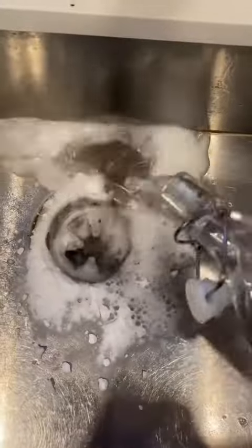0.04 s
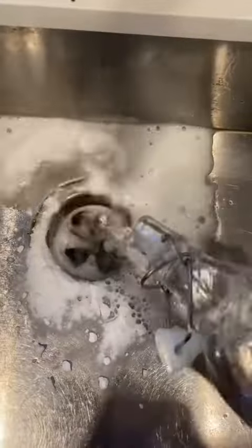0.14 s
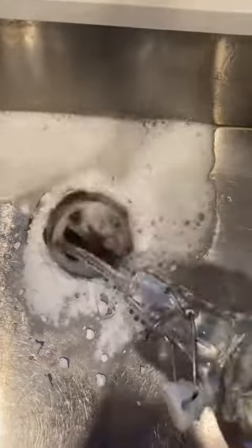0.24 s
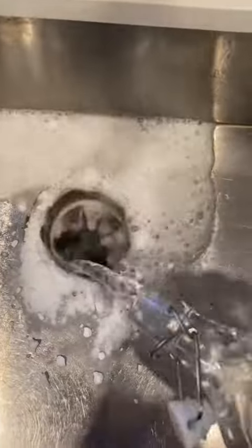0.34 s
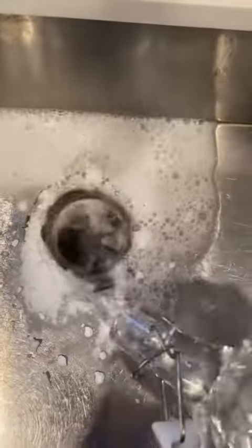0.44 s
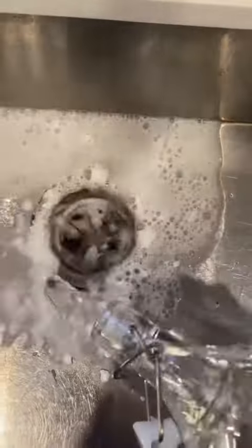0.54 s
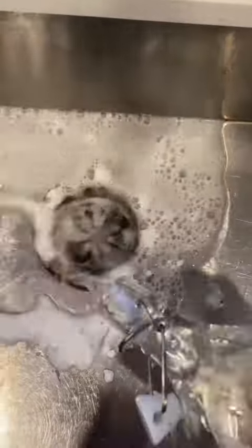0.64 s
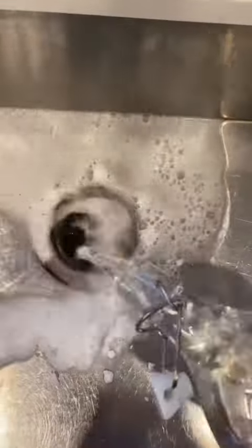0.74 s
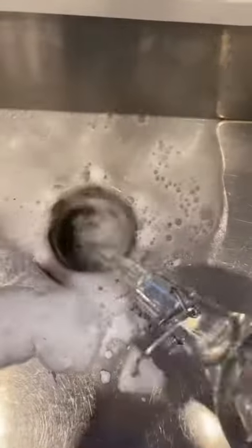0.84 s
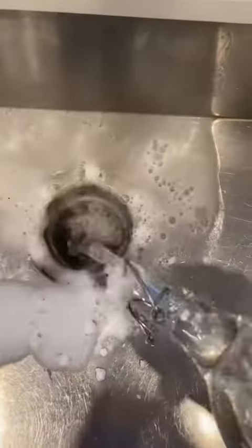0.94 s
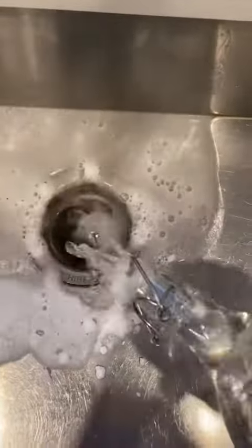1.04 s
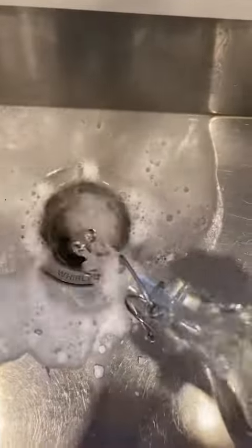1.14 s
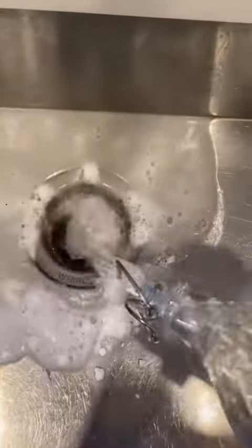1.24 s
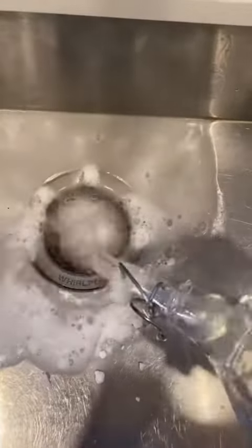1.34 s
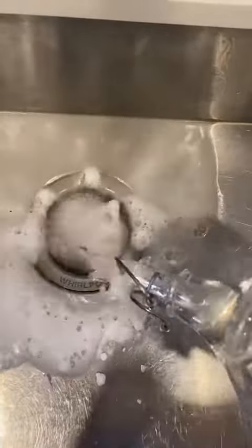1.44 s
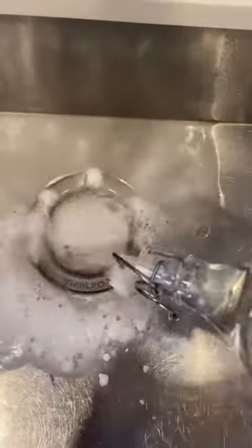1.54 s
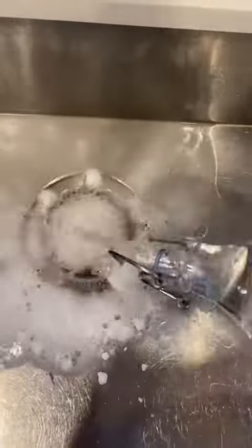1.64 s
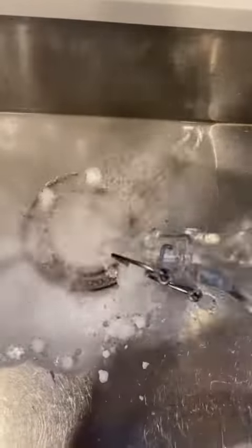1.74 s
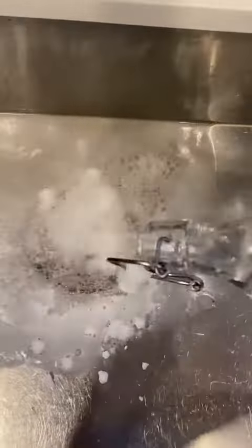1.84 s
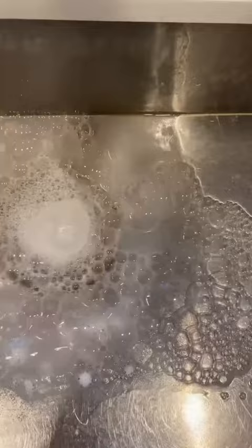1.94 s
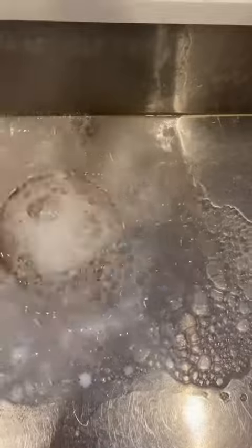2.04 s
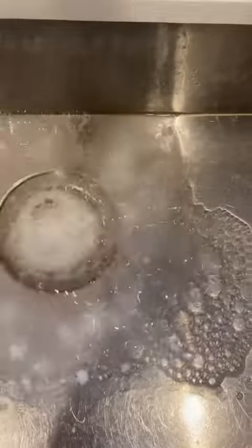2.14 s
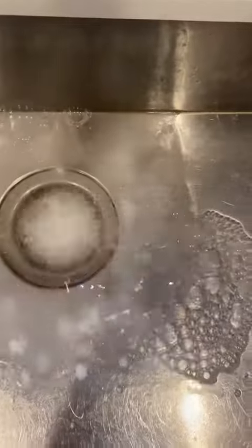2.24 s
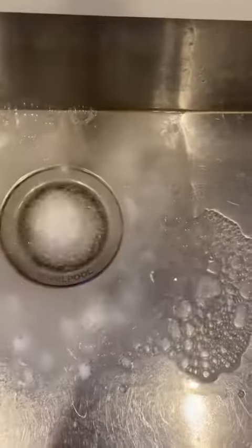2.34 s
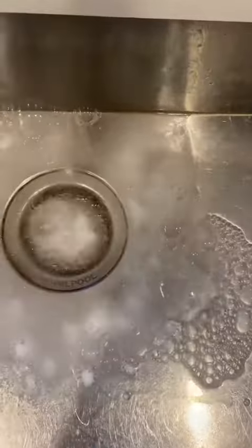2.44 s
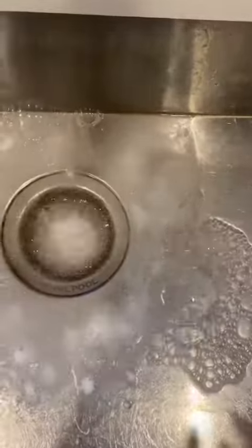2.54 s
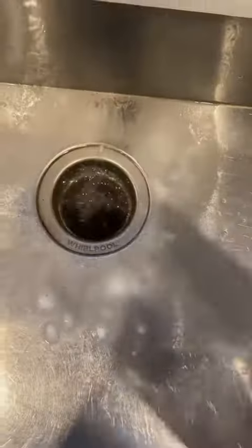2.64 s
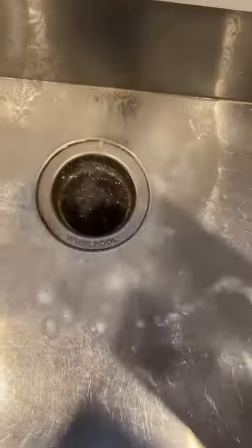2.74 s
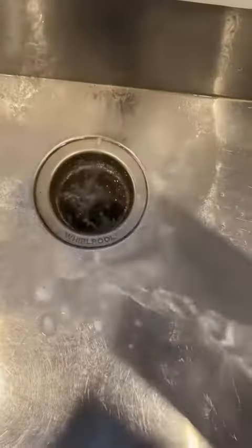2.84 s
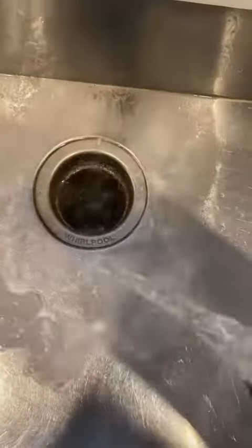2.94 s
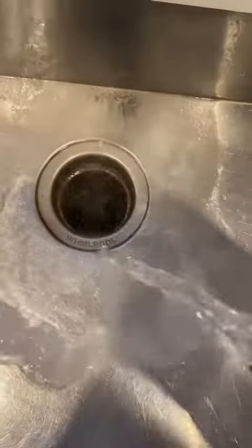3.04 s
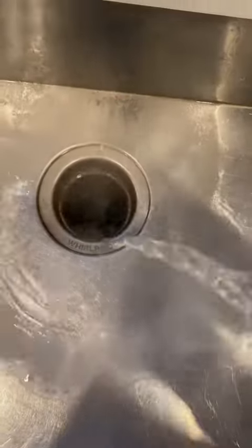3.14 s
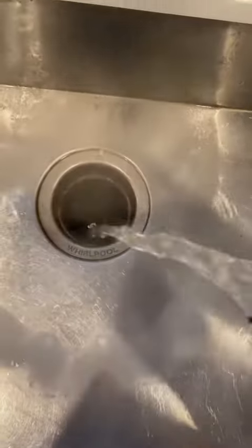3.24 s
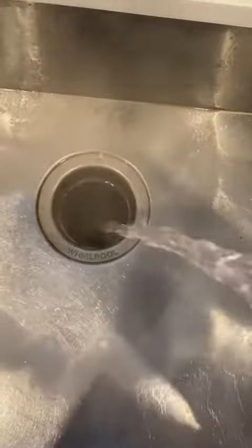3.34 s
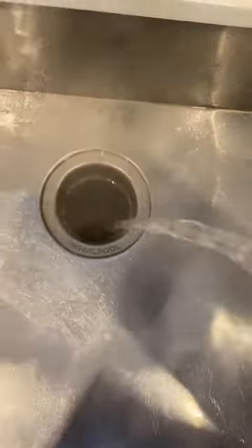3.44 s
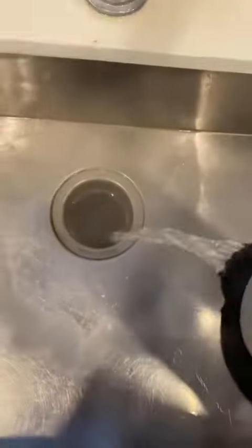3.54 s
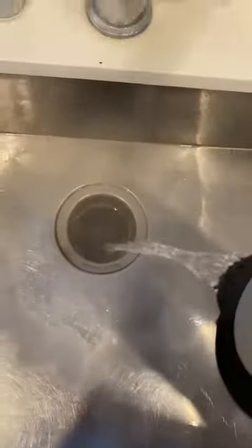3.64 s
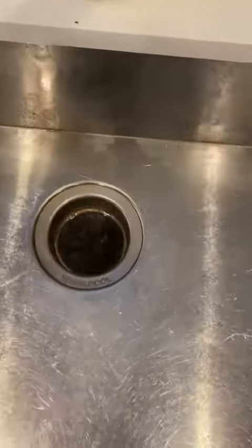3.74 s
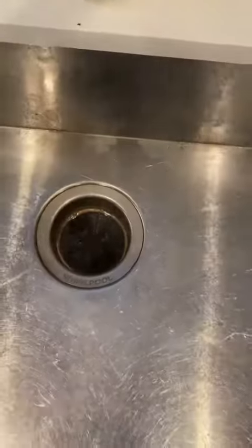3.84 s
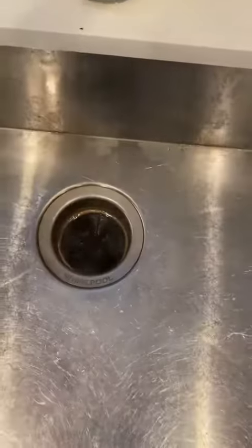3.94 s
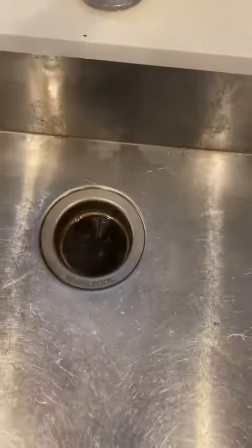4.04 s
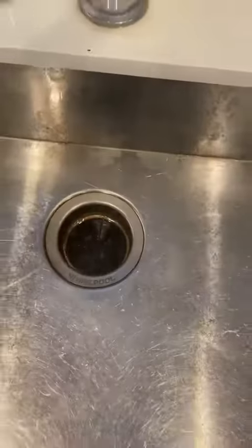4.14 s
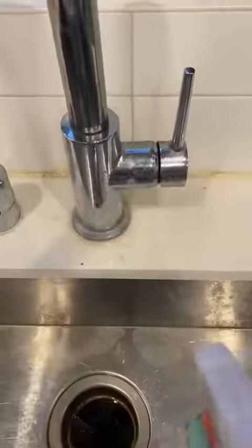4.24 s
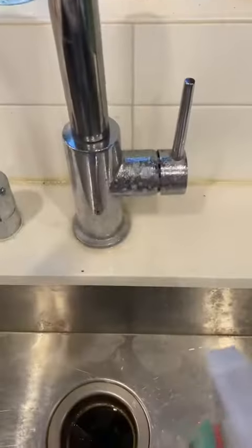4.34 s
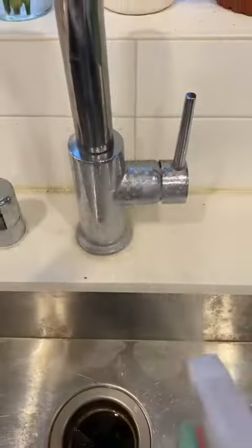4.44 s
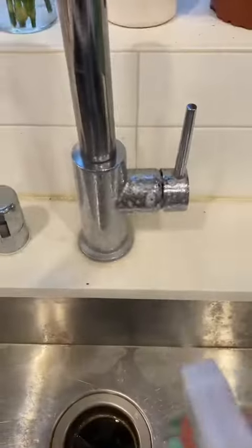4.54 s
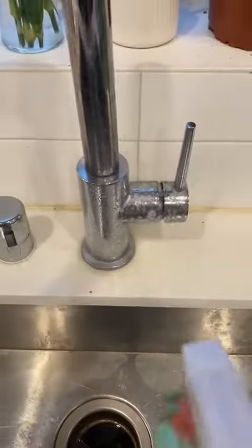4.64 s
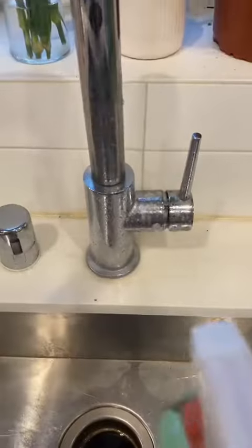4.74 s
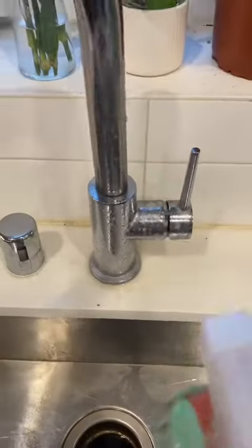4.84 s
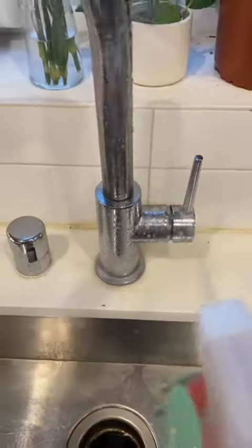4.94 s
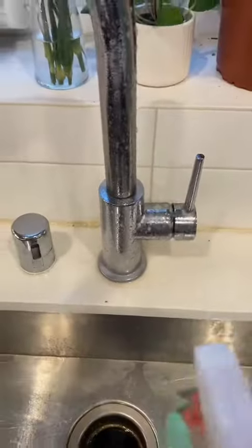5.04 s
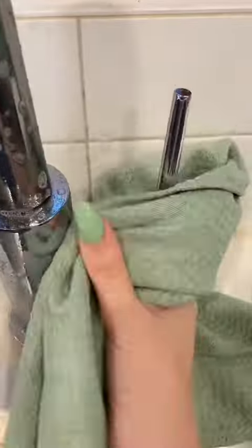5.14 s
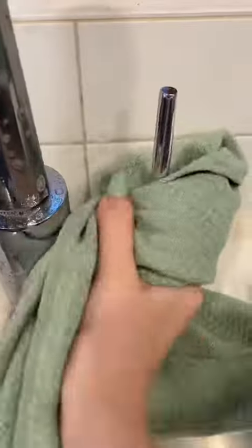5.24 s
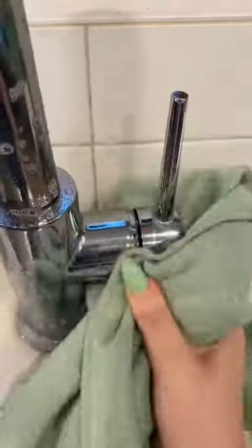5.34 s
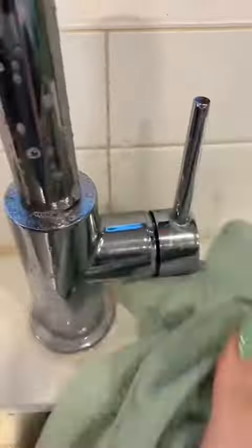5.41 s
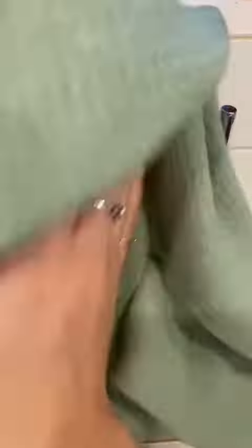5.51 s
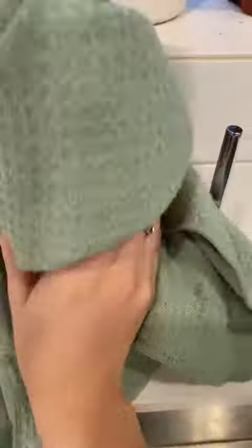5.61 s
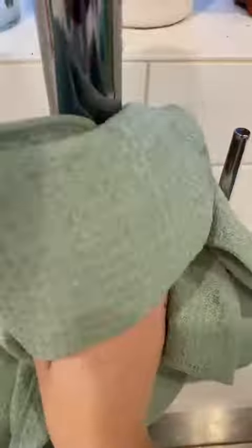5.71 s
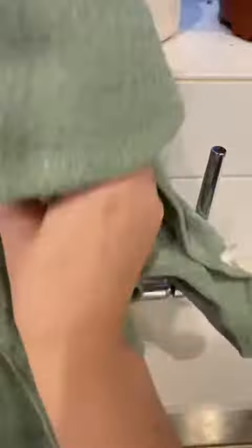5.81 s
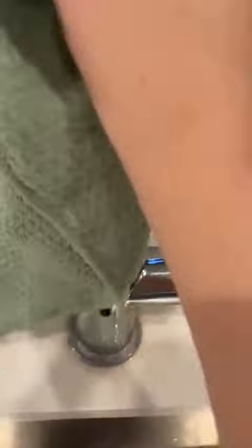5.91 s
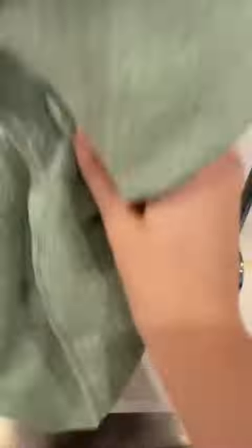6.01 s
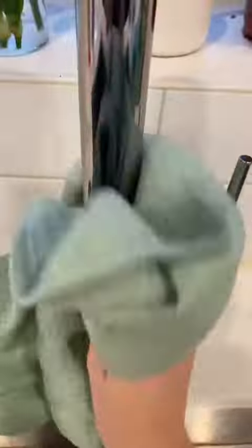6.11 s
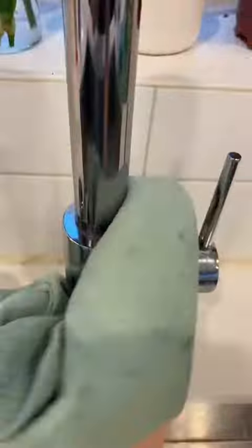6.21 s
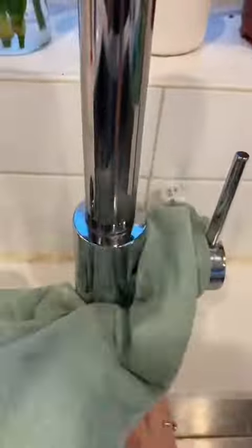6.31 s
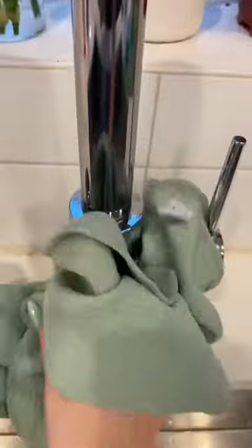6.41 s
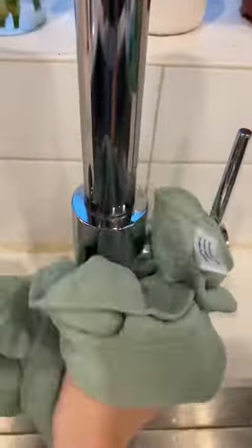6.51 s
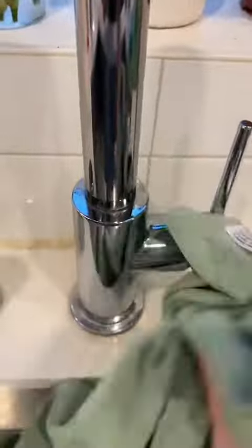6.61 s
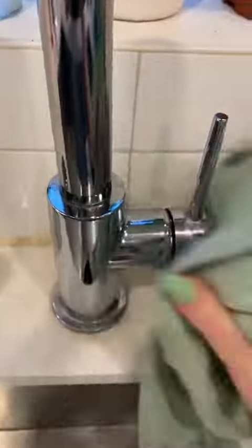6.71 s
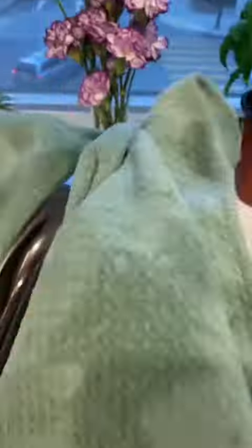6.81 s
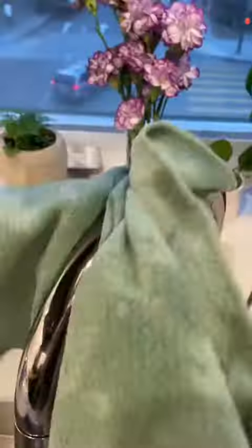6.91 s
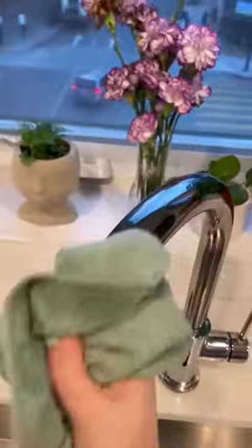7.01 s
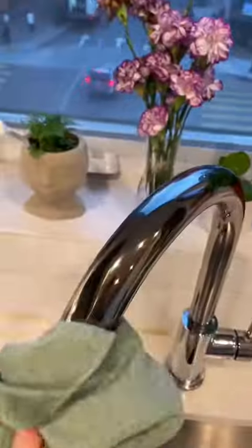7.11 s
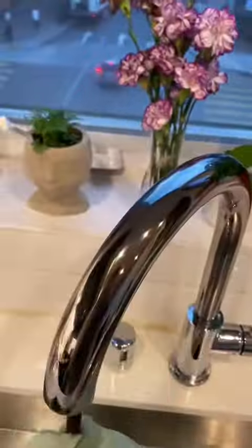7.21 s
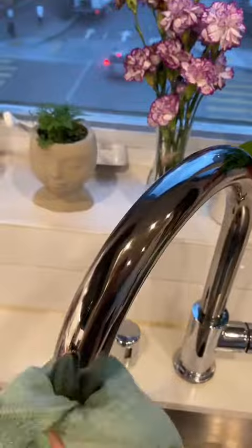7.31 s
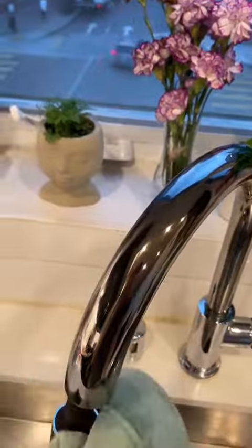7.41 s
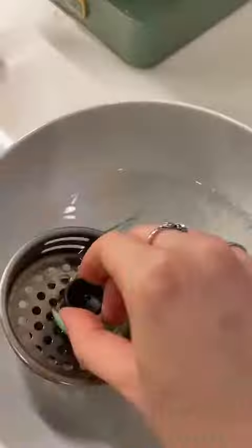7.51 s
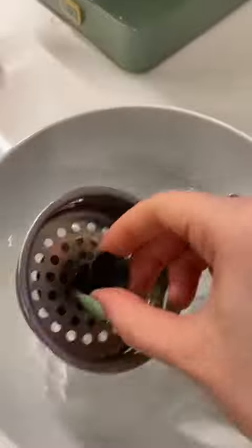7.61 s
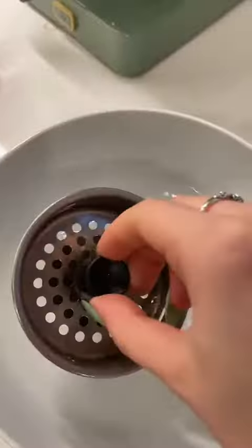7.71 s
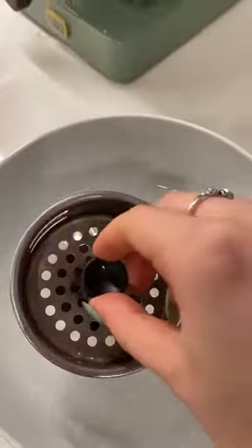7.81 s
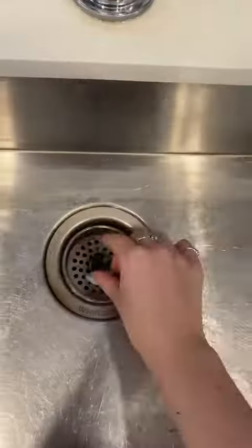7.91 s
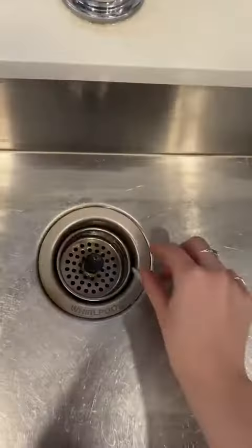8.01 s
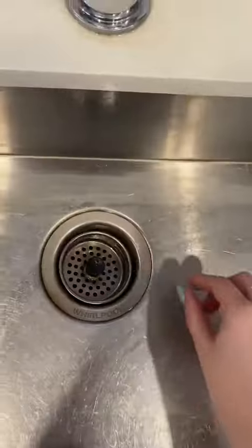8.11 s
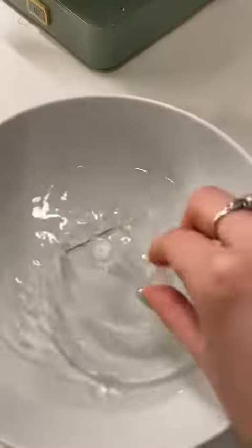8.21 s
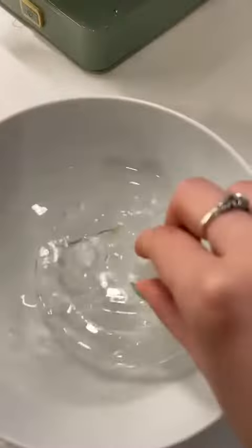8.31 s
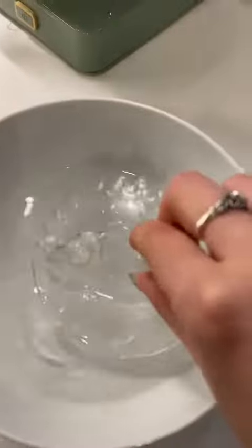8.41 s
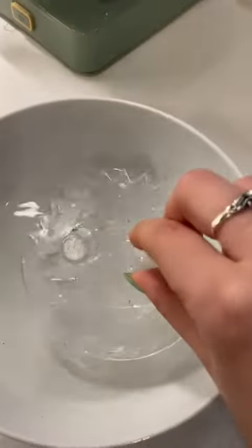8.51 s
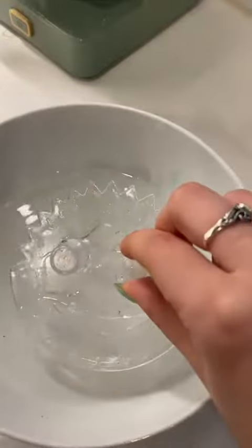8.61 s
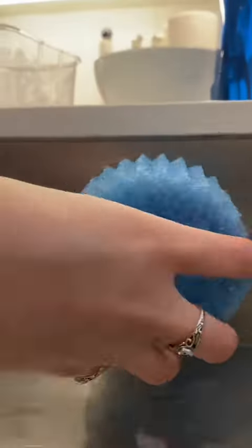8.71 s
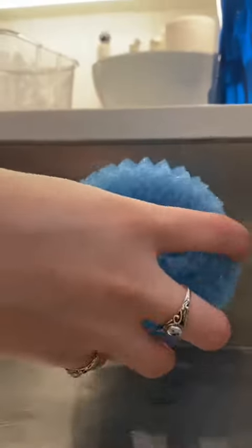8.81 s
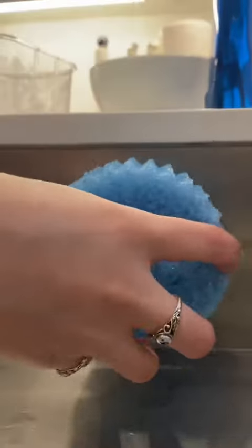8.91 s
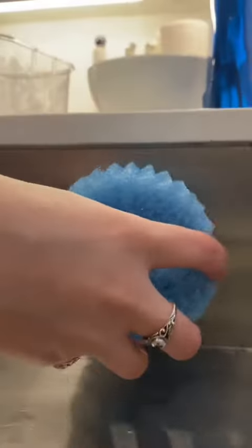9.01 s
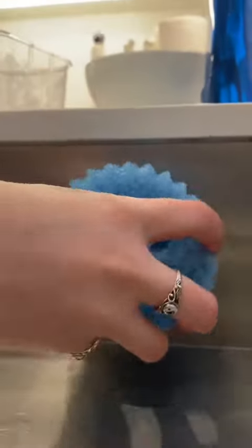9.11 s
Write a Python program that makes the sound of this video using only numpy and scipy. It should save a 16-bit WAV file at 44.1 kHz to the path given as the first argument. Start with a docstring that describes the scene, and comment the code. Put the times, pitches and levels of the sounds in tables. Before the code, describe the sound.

Close stereo sound at a steel kitchen sink, with short metallic reflections and a faint room murmur. From 0 to 2.7 s liquid pours from a bottle in uneven glugs onto fizzing, crackling foam, booming the basin; a glass stopper clinks near 0.9 s, and heavier gulps plop at 2.0 and 2.2 s. A water jet spatters and drums on the floor from 2.7 s, gurgles into the drain from about 3.1 s, and stops at 3.7 s, leaving weak drips until 4.2 s. Nine rapid trigger squirts hiss and thump, 4.2-5.0 s, with plastic snaps. A cloth rubs softly over the tap, 5.15-7.5 s, with padded bumps and a hollow spout; a distant motor drones faintly around 7 and 8 s. Small metal clicks begin at 7.5 s. At 7.9 s a strainer clatters sharply into the drain and rings briefly. Wet scrubber slaps with low thuds come at 8.76-9.1 s.

```python
"""Liquid glugs from a bottle onto fizzing soda in a steel kitchen sink, then a jet drums and drains,
a trigger bottle sprays, a cloth wipes the tap, a strainer drops into the drain and a scrubber dabs.
Foam, jet, mist and cloth are noise shaped by spectra; basin, spout and bottle are sets of resonances;
glass and strainer are decaying sine modes; bubbles are short rising tones. A motor drones far away."""
import sys
import numpy as np
from scipy import signal
from scipy.fft import rfft, irfft, next_fast_len
from scipy.io import wavfile
from scipy.ndimage import map_coordinates

SR = 44100
rng = np.random.default_rng(int(sys.argv[2]) if len(sys.argv) > 2 else 0)


def dump(signal):
    """Clip the signal to [-1, 1] and save it as 16-bit WAV at the path in sys.argv[1]."""
    limited = np.clip(np.atleast_2d(signal).T, -1, 1)
    pcm = np.round(limited * 32767).astype(np.int16)
    wavfile.write(sys.argv[1], SR, pcm)


N = 403956


def amp(db):
    """Level law: decibels to amplitude gain."""
    return 10 ** (np.asarray(db) / 20)


def unit(x):
    """Normalisation: a signal scaled to rms 1."""
    return x / np.sqrt(np.mean(x ** 2) + 1e-20)


def clock():
    """Sampling: the time of every sample in seconds."""
    return np.arange(N) / SR


def along(points, hz):
    """Logarithmic frequency scale: (hz, value) points joined by straight lines."""
    f, v = np.transpose(points)
    return np.interp(np.log(hz + 1), np.log(f + 1), v)


def levels(rows, edge=0.0046):
    """Level interpolation in dB: a gain curve for each column, silent outside the rows' span."""
    s, *columns = np.transpose(rows)
    gate = np.clip(1 + np.minimum(clock() - s[0], s[-1] - clock()) / edge, 0, 1)
    return [gate * amp(np.interp(clock(), s, column)) for column in columns]


def wobble(rate):
    """Slow random modulation: a smooth curve with rate knots a second."""
    knots = rng.standard_normal(2048)
    coarse_s = clock()[::64]
    curve = map_coordinates(knots, [coarse_s * rate], mode="wrap")
    return np.interp(clock(), coarse_s, curve)


def filtered(x, response):
    """Linear filtering: the spectrum of x times a response of frequency."""
    m = next_fast_len(N + SR // 4, True)
    return irfft(rfft(x, m) * response(np.fft.rfftfreq(m, 1 / SR)), m)[..., :N]


def colour(points):
    """Spectral shaping: the response of a (hz, level_db) spectrum."""
    return lambda hz: amp(along(points, hz))


def body(modes):
    """Modal superposition: (hz, width_hz, level_db) resonances, summed with alternating signs."""
    def response(f):
        total = 0
        for k, (centre, width, db) in enumerate(modes):
            damping = 1j * f * width
            total = total + (-1) ** k * amp(db) * damping / (centre * centre - f * f + damping)
        return total
    return response


def rush(response, rate=0, spread_db=3):
    """Shot noise: stereo of rms 1, smooth or mixed with tiny impacts at rate a second."""
    # likeness of left and right: hz, correlation
    alike = [(100, 1), (250, 1), (450, 0.89), (750, 0.68), (1000, 0.72), (1700, 1), (2800, 0.43),
             (5000, 0.58), (12000, 0.43)]
    x = rng.standard_normal((2, N))
    if rate:
        hits = rng.random(N) < rate / SR
        sizes = amp(spread_db * np.minimum(rng.exponential(size=N), 4))
        x = unit(x * hits * sizes) + .5 * x

    def mid_and_side(hz):
        turn = np.arccos(np.clip(along(alike, hz), -1, 1)) / 2
        return response(hz) * np.array([np.cos(turn), np.sin(turn)])

    mid, side = filtered(x, mid_and_side)
    return unit(np.array([mid + side, mid - side]))


def blows(rows, rise):
    """Exponential decay: (peak_s, level_db, t60_s) blows that swell with time constant rise."""
    env = np.zeros(N)
    for s, db, t60 in rows:
        near = np.arange(max(int((s - .1) * SR), 0), min(int((s + .5) * SR), N))
        t = near / SR - s
        env[near] += amp(db - 60 * np.maximum(t, 0) / t60) * np.exp(np.minimum(t, 0) / rise)
    return env


def strokes(rows, edge):
    """Sustained excitation: the envelope of (start_s, length_s, level_db) strokes with soft edges."""
    t = clock()
    env = np.zeros(N)
    for s, length, db in rows:
        onset = np.interp(t, [s - edge, s + edge], [0, 1])
        release = np.interp(t, [s + length - edge / 2, s + length + 2 * edge], [1, 0])
        env += amp(db) * np.minimum(onset, release)
    return env


def swell(middle, length):
    """Smooth excitation: a rounded rise and fall about its middle."""
    return np.maximum(1 - ((clock() - middle) / (length * .7)) ** 2, 0) ** 2


def ring(hits, modes, scatter_db, width=.2):
    """Free vibration: hits add energy to (hz, level_db, t60_s) modes and jolt their phase."""
    out, t = np.zeros((2, N)), np.arange(SR // 2) / SR
    s, db = np.transpose(hits)
    age = t - (s - s[0])[:, None]
    latest = np.sum(age >= 0, axis=0) - 1
    for hz, level, t60 in modes:
        size = db + level + scatter_db * rng.standard_normal(len(s))
        decays = amp(size[:, None] - 60 * np.abs(age) / t60) * (age >= 0)
        env = np.linalg.norm(decays, axis=0)
        jolt = 2 * np.pi * rng.random(len(s))[latest]
        # the ears differ by width radians from 3 kHz up, by less below
        ears = width * rng.choice([-.5, .5]) * np.array([[1], [-1]]) * min(hz / 3000, 1)
        out[:, round(s[0] * SR):][:, :len(t)] += env * np.sin(2 * np.pi * hz * t + jolt + ears)
    return out


def knocks(hits, modes, rise):
    """Damped oscillation: soft (s, level_db) blows set (hz, level_db, t60_s) modes swinging."""
    out, t = np.zeros(N + SR), np.arange(SR // 4) / SR
    for s, db in hits:
        swing = np.zeros(len(t))
        for hz, level, t60 in modes:
            pitch = hz * (1 + .03 * rng.standard_normal())
            swing += amp(db + level - 60 * t / t60) * np.sin(2 * np.pi * pitch * t)
        out[round(s * SR):][:len(t)] += swing * (1 - np.exp(-t / rise))
    return out[:N]


def struck(envelope, response, width):
    """Forced vibration: contact noise drives a body; width is the share unlike between the ears."""
    noise = rng.standard_normal(N) + width * rng.standard_normal((2, N))

    def even(hz):
        return response(hz) / np.sqrt(np.mean(np.abs(response(hz)) ** 2))

    return filtered(envelope * unit(noise), even)


def sings(rows, q):
    """Resonant filtering: (middle_s, length_s, level_db, pitch_hz) swells of narrow noise."""
    out = np.zeros((2, N))
    for s, length, db, hz in rows:
        env = swell(s, length)
        near = np.flatnonzero(env)
        noise = rng.standard_normal(SR) + .5 * rng.standard_normal((2, SR))
        peak = signal.iirpeak(hz, q, SR)
        tone = unit(signal.lfilter(*peak, signal.lfilter(*peak, noise)))
        out[:, near] += amp(db) * env[near] * tone[:, :len(near)]
    return out


def clicks(rows, q, rise_share):
    """Impact on a resonator: (s, level_db, pitch_hz, t60_s) bursts, the longer ones softer in onset."""
    out, t = np.zeros((2, N + SR)), np.arange(-SR // 16, SR // 8) / SR
    for s, db, hz, t60 in rows:
        noise = rng.standard_normal(len(t)) + .5 * rng.standard_normal((2, len(t)))
        tone = signal.lfilter(*signal.iirpeak(hz, q, SR), noise)
        env = amp(db - 60 * np.maximum(t, 0) / t60) * np.exp(np.minimum(t, 0) / (rise_share * t60))
        out[:, round((s + t[0]) * SR):][:, :len(t)] += unit(tone) * env
    return out[:, :N]


def bubbles(rate, pitch_hz, cycles, octaves=1, from_s=0, count=400):
    """Bubble resonance: air pockets and droplets ring within octaves of a pitch, rising as they fade."""
    chance = rng.random((count, 4))
    start = from_s + np.cumsum(-np.log(1 - chance[:, 0])) / rate  # Poisson arrivals
    hz = pitch_hz * 2 ** (octaves * (2 * chance[:, 1:2] - 1))
    t = np.arange(SR // 25) / SR
    age = t * hz / cycles
    env = chance[:, 2:3] ** 2 * np.exp(-age) * (1 - np.exp(-8 * age))
    blips = env * np.sin(2 * np.pi * hz * t * (1 + 0.045 * np.minimum(age, 4)))
    at = (start[:, None] * SR).astype(int) + np.arange(len(t))
    place = chance[:, 3:] / 2
    return np.array([np.bincount(at.ravel(), (blips * side).ravel(), N)[:N] for side in (.5 + place, 1 - place)])


def pan(x, left_db):
    """Interaural level difference: leans a sound to the left."""
    return x * amp([[left_db / 2], [-left_db / 2]])


def pour():
    """Bubble bursts and forced vibration: foam fizzes while the stream drums on the steel."""
    # fizz of the soda and force of the stream, relative levels: s, foam_hiss_db, splash_db
    strength = [(0, -41, -39.5), (.75, -37.5, -40.5), (1.0, -35, -36.5), (1.2, -37, -34), (1.6, -38.5, -38),
                (1.92, -35.5, -36), (2.3, -40.5, -37.5), (2.66, -43, -37)]
    # the bottle empties in surges that boom the basin: start_s, length_s, level_db
    surges = [(.29, 0.012, -28.5), (.54, 0.27, -36.5), (.85, 0.098, -33), (1.1, 0.043, -32.5),
              (1.26, 0.17, -33.5), (1.53, 0.11, -29.5), (1.8, 0.14, -31.5), (2.01, 0.078, -35),
              (2.51, 0.035, -37)]
    # the stream churns air into the pool, relative levels: start_s, length_s, bubble_db
    churn = [(.1, 0.96, -39.5), (1.16, 0.28, -35), (1.52, 0.32, -43)]
    # foam spectrum: hz, density_db_per_hz
    foam_spectrum = [(500, -30), (1200, -5), (2200, 0.5), (2700, 4.5), (3300, 0), (4400, 2.5), (6000, 4),
                     (8500, 2), (11500, -1.5), (15500, -3)]
    # basin resonances: hz, width_hz, level_db
    basin = [(142.6, 13.1, 3.5), (224.3, 32.3, -2), (402, 55, -9.5), (517, 29.5, -7.5), (735, 68, -12),
             (924, 96, -16.5), (1120, 247, -21.5)]
    boom_between_db = -44  # the basin between surges

    hiss, splash = levels(strength)
    boom = np.maximum(strokes(surges, edge=0.044), amp(boom_between_db) * (splash > 0))
    foam = hiss * amp(1.05 * wobble(25.01)) * rush(colour(foam_spectrum), rate=9700, spread_db=1.5)
    stream = splash * amp(2.0 + 0.48 * wobble(25.0)) * rush(body(basin), rate=1500, spread_db=0.5)
    patter_body = body([(1127, 720, -0.53), (2300, 940, -1.5)])
    patter = amp(-15.5 + 5.3 * wobble(45.3)) * rush(patter_body, rate=900, spread_db=4.0)
    small = bubbles(rate=220, pitch_hz=1750, cycles=7.7, count=520)
    large = amp(3.5) * bubbles(rate=58, pitch_hz=748, cycles=4.3)
    blips = strokes(churn, edge=0.056) * (small + large + patter)
    panel = boom * amp(0.94 * wobble(21)) * rush(body([(62.0, 16, 6.5), (116, 44, -12.5)]))
    return foam + stream + blips + panel + gulps()


def gulps():
    """Impact and cavity resonance: slugs of liquid splash and thud while trapped air squeaks."""
    # gulps landing on the basin: s, splash_db, splash_t60_s, thud_db
    landings = [(2.008, -16.5, 0.047, -32), (2.0117, -25, 0.036, -21.5), (2.035, -28, 0.27, -28),
                (2.215, -23.5, 0.19, -36), (2.222, -35, 0.065, -21)]
    # squeaks of trapped air: start_s, length_s, first_hz, last_hz, level_db
    chirps = [(1.999, 0.022, 2270, 1920, -43), (2.198, 0.03, 1950, 2440, -40.5)]
    # splash spectrum: hz, density_db_per_hz
    splash_spectrum = [(80, -15), (200, 8), (330, 4), (560, -1.5), (1100, -8), (1600, -31), (2200, -28),
                       (4000, -41)]
    # modes of the thud: hz, level_db, t60_s
    thud_modes = [(230, 6, 0.052), (389, -1, .04), (600, 6, 0.042)]

    splash = blows([row[:3] for row in landings], rise=0.0018) * rush(colour(splash_spectrum))
    thud = knocks([(s, db) for s, splash_db, t60, db in landings], thud_modes, rise=.001)
    squeak = np.zeros(N)
    for s, length, first_hz, last_hz, db in chirps:
        glide = np.interp(clock(), [s, s + length], [first_hz, last_hz])
        pitch = glide * (1 + 0.042 * wobble(400))
        squeak += amp(db) * swell(s + length / 2, length) * np.sin(2 * np.pi * np.cumsum(pitch) / SR)
    return splash + thud + squeak


def stopper():
    """Impact and free vibration: the wire stopper ticks on the glass bottle, which rings briefly."""
    # the wire hits the glass, relative levels: s, level_db
    clinks = [(0.8848, -23.5), (0.8875, -23), (0.894, -23.5), (0.947, -32)]
    # glass modes: hz, level_db, t60_s
    glass = [(2025, -13, .04), (2665, -12, .04), (3977, -11, .035), (4160, -1, .05), (4538, 0, .06),
             (6230, -15, .035), (7752, -10, .08), (10000, -18, .033)]
    wire = body([(725, 200, -3.5), (2420, 580, -1.5), (4590, 1700, -2), (9700, 8000, -28.5)])
    tick = blows([(s, db - 10.0, .04) for s, db in clinks], rise=0.011) * rush(wire)
    return tick + amp(-1) * ring(clinks, glass, scatter_db=-7.5)


def rinse():
    """Turbulent impact and plate modes: a jet spatters, booms the floor and gurgles down the drain."""
    # the jet spits: peak_s, level_db, t60_s
    spurts = [(2.731, -72, 0.03), (2.838, -39.5, 0.096)]
    # sizzles on the drain's flange as the aim shifts: middle_s, length_s, level_db, pitch_hz
    sizzles = [(3.17, 0.029, -50.5, 2670), (3.19, 0.1, -54, 5050), (3.255, 0.065, -52, 4870),
               (3.295, 0.025, -47, 4370), (3.35, 0.11, -55, 4370), (3.395, 0.074, -46.5, 4860),
               (3.5, 0.23, -51, 4800), (3.615, 0.084, -51.5, 2270), (3.63, 0.18, -51, 4500)]
    # the jet bears on the floor panel: start_s, length_s, level_db
    pushes = [(2.7, 0.21, -41.5), (2.86, 0.23, -39.5), (3.04, 0.32, -32), (3.53, 0.18, -30.5)]
    # the jet plunges into the drain: start_s, length_s, level_db
    plunges = [(3.185, 0.042, -29.5), (3.24, 0.03, -29), (3.3, 0.07, -38), (3.385, 0.09, -32),
               (3.51, 0.1, -39), (3.6, 0.079, -35.5)]
    # spatter spectrum: hz, density_db_per_hz
    spatter_spectrum = [(600, -30), (1500, 0.5), (2300, -1.5), (3100, -5), (4800, 0), (6500, 2),
                        (11000, -4), (15500, -6.5)]
    # resonances of the wet basin, then of the drain: hz, width_hz, level_db
    wet_basin = [(225, 32, 1), (406, 77, -2.5), (627, 47, -3.5), (751, 73, -2), (953, 91, -3.5),
                 (1320, 500, -13.5), (1660, 2700, -21.5)]
    drain = [(225.6, 36.4, 4), (276, 84, -2.5), (380, 91, -15), (1010, 410, -22)]
    on_s, at_drain_s, off_s = 2.668, 3.076, 3.725  # flat floor first, then the drain
    swing_s = 0.15  # the swing starts this long before at_drain_s and ends half as long after
    on_floor, at_drain = (-62.5, -42.5), (-48, -43.5)  # relative spatter and splash, dB

    spatter, splash = levels([(on_s, *on_floor), (at_drain_s - swing_s, *on_floor),
                              (at_drain_s + swing_s / 2, *at_drain), (off_s, *at_drain)])
    spray_noise = rush(colour(spatter_spectrum), rate=3600, spread_db=-1.5)
    drops = (spatter + blows(spurts, rise=0.0067)) * amp(0.86 * wobble(33)) * spray_noise
    steel = splash * amp(2.1 * wobble(27.2)) * rush(body(wet_basin), rate=3600, spread_db=0.5)
    # the floor panel swings at its lowest mode, pushed unevenly by the jet
    push = strokes(pushes, edge=0.023) * amp(0.71 * wobble(4.6))
    panel_hz = 54.4 + 2.13 * wobble(16)
    panel = push * np.sin(2 * np.pi * np.cumsum(panel_hz) / SR) * np.sqrt(2)
    gurgle = strokes(plunges, edge=0.0042) * rush(body(drain))
    rumble_env = strokes([(2.705, 0.057, -30), (3.88, 0.13, -41.5)], edge=0.011)
    rumble = rumble_env * rush(body([(70.5, 14.0, 8.5), (100, 48.0, -2.0)]))
    return drops + sings(sizzles, q=2.3) + steel + panel + gurgle + trickle(scatter_db=2.5) + rumble


def trickle(scatter_db, count=10):
    """Pipe and bubble resonance: last drops crackle at uneven gaps, on average ever weaker."""
    # the clearest drops in the pipe: peak_s, level_db, t60_s
    drips = [(3.841, -53, 0.06), (4.121, -56, 0.05)]
    # pipe resonances: hz, width_hz, level_db
    pipe = [(1370, 250, 7), (2270, 91, 9), (4360, 130, 3), (5200, 160, -4), (7000, 1300, -3.5)]
    start_s, length_s = 3.825, 0.371
    first_db, sag_db_per_s, t60_s = -61.5, 9, 0.068

    age = length_s * (np.arange(count) + rng.random(count) - .5) / (count - 1)
    db = first_db - sag_db_per_s * age + scatter_db * rng.standard_normal(count)
    drops = np.c_[start_s + age, db, np.full(count, t60_s)]
    air_level = levels([(start_s, -51), (start_s + length_s, -59)])[0]
    air = air_level * bubbles(rate=130, pitch_hz=1750, cycles=14, octaves=.45, from_s=start_s, count=90)
    impacts = blows(drops, rise=0.023) + blows(drips, rise=0.0009)
    return air + impacts * rush(body(pipe), rate=5300, spread_db=2.5)


def spray():
    """Jet noise and cavity resonance: squeezes thump the hollow bottle; its nozzle hisses and spits."""
    # squirts of mist, relative levels: start_s, length_s, hiss_db, bottle_db, nozzle_hz
    squirts = [(4.213, 0.037, -46.5, -80, 11000), (4.251, 0.084, -44, -73, 10000),
               (4.355, 0.049, -44, -47, 1500), (4.419, 0.076, -38, -52, 2300),
               (4.503, 0.036, -42.5, -47.5, 1200), (4.542, 0.081, -39.5, -48, 2180),
               (4.649, 0.089, -38, -37, 2470), (4.763, 0.085, -39, -38.5, 2300),
               (4.875, 0.099, -43, -41.5, 1600)]
    # mist spectrum: hz, density_db_per_hz
    mist_spectrum = [(350, -10.5), (600, -11), (1180, -9), (2070, -7), (2540, -4.5), (3240, -10),
                     (5820, -7.5), (7240, -5.5), (11800, -19.5), (13700, -13.5), (15500, -22)]
    # bottle resonances: hz, width_hz, level_db
    bottle = [(471.6, 30, 11.5), (1290, 470, -5.5)]
    # bottle modes: hz, level_db, t60_s
    bottle_ring = [(476, -1, 0.083), (1220, -17, 0.025)]
    nozzle_db, droplets_db = -11, 1  # relative to the hiss column
    ring_db = -4  # relative to the bottle column

    flow = np.zeros(N)
    for s, length, db, bottle_db, hz in squirts:
        turns = s + length * np.array([-0.21, 0.5, 0.62, 1.153])  # the pressure swells, holds and sinks
        flow += amp(db) * np.interp(clock(), turns, [0, 1, 1, 0])
    grit = amp(2.3 * wobble(90))
    mist = flow * amp(-2) * grit * rush(colour(mist_spectrum), rate=2200, spread_db=-0.5)
    nozzle = sings([(s + length / 2, length, db + nozzle_db, hz)
                    for s, length, db, bottle_db, hz in squirts], q=1.5)
    spit = bubbles(rate=240, pitch_hz=1820, cycles=2.7, octaves=1.23, from_s=squirts[0][0])
    droplets = amp(droplets_db) * flow * spit
    hollow = knocks([(s + .024, db + ring_db) for s, length, hiss_db, db, hz in squirts],
                    bottle_ring, rise=0.0038)
    thumps = blows([(s + 0.031, db, .11) for s, length, hiss_db, db, hz in squirts], rise=0.019)
    return mist + nozzle + droplets + amp(-0.5) * thumps * rush(body(bottle)) + hollow


def trigger(t60):
    """Impact on a resonator: the plastic trigger snaps during hard squeezes."""
    # snaps: s, level_db, pitch_hz
    snaps = [(4.376, -43, 1300), (4.647, -39, 5200), (4.767, -38, 5600), (4.891, -34.5, 2800),
             (4.918, -41, 2600)]
    return clicks([(s, db, hz, t60) for s, db, hz in snaps], q=1.7, rise_share=0.089)


def cloth():
    """Friction noise and tube resonance: fibres brush the chrome; firm strokes sound the hollow spout."""
    # the cloth slides over the tap: start_s, length_s, level_db
    wipes = [(5.15, 0.067, -67), (5.25, 1.53, -65.5), (6.96, 0.54, -68.5)]
    # firmer passes that make the tube sing: middle_s, length_s, brush_db, tube_db, tube_hz
    passes = [(5.346, 0.22, -73, -83, 2500), (5.515, 0.24, -74, -82, 2300), (5.815, 0.12, -71, -73, 2700),
              (6.011, 0.25, -71, -65.5, 2520), (6.31, 0.078, -73, -67.5, 2600),
              (6.436, 0.091, -66.5, -65, 2420), (6.553, 0.15, -65.5, -64.5, 2400),
              (7.042, 0.24, -76.5, -68, 2450), (7.379, 0.084, -74, -70, 2400)]
    # the cloth presses along the spout: start_s, length_s, body_db, rasp_db
    rubs = [(7.142, 0.026, -40, -54.5), (7.167, 0.038, -40, -61), (7.236, 0.067, -45.5, -65),
            (7.425, 0.017, -57.5, -73)]
    # padded bumps against the tap: peak_s, level_db, t60_s
    bump_rows = [(5.128, -49, 0.088), (5.224, -40, 0.1), (6.755, -49.5, 0.036)]
    # spectra of brushing, then of rasping: hz, density_db_per_hz
    brush_spectrum = [(250, -43.5), (420, 0), (700, -5), (1200, -8.5), (1800, -9.5), (2500, -9.5),
                      (3200, -14.5), (6000, -14), (8500, -19.5), (11500, -23), (15500, -27.5)]
    rasp_spectrum = [(1200, -9), (1700, -6), (2800, 4), (4500, -3), (6300, 6), (8000, 1), (11500, -12),
                     (15500, -13)]
    # spout resonances: hz, width_hz, level_db
    spout = [(227, 120, 2), (438, 39, 6.5), (590, 30, 6.5), (850, 137, 0), (1226, 230, -10),
             (2450, 820, -32.5)]
    pressure_per_s, pressure_db = 9.5, 0.1  # the wipe's pressure stays almost steady

    contact = strokes(wipes, edge=0.046) * amp(pressure_db * wobble(pressure_per_s))
    contact = contact + sum(amp(db) * swell(s, length) for s, length, db, tube_db, hz in passes)
    brush = contact * amp(1.5 * wobble(27)) * rush(colour(brush_spectrum), rate=4200, spread_db=0.0)
    tube = sings([(s, length, db, hz) for s, length, brush_db, db, hz in passes], q=2.6)
    press_env = strokes([row[:3] for row in rubs], edge=0.015) * amp(1.8 * wobble(66))
    press = press_env * rush(body(spout))
    rasp_env = strokes([(s, length, db) for s, length, body_db, db in rubs], edge=0.016)
    rasp = rasp_env * rush(colour(rasp_spectrum))
    tap = body([(150, 59, 13.0), (440, 160, 7.5), (1060, 124, 4.0), (2450, 630, -11.0)])
    bumps = blows(bump_rows, rise=0.0018) * rush(tap)
    return brush + tube + press + rasp + bumps


def metal_contacts():
    """Impact on resonators: light clicks on spout and strainer, and one dull knock over the bowl."""
    # light metal contacts, then the knock: s, level_db, ring_hz, t60_s
    light = [(6.757, -54, 2400, 0.01), (7.529, -55, 4560, 0.065), (7.544, -50.5, 2430, 0.09),
             (7.612, -48.5, 2870, .1), (7.653, -42.5, 3290, 0.042), (7.776, -51.5, 3660, 0.055),
             (8.174, -49, 2150, 0.0093), (8.382, -75, 5300, .03), (8.581, -66, 4910, .03)]
    dull = [(7.761, -55.5, 986, 0.079)]
    return clicks(light, q=5.5, rise_share=.018) + clicks(dull, q=28, rise_share=.15)


def strainer():
    """Impact and modal beating: the basket chatters on its rim, clashes into the drain and rings out."""
    # it skids, lands on its rim, clashes and rocks free: s, rim_db, clash_db, ring_db
    drop = [(7.9087, -25, -37, -40), (7.9158, -17, -24.5, -32), (7.921, -20, -30, -34),
            (7.931, -25, -19, -27), (7.9405, -31, -27, -30), (7.9492, -37, -32.5, -26.5)]
    # metal parts slide in the hand: start_s, length_s, level_db
    slides = [(7.53, 0.15, -72), (7.745, 0.018, -62), (7.8, 0.06, -79)]
    # rim resonances: hz, width_hz, level_db
    rim_modes = [(2400, 200, 1), (2770, 120, -0.5), (3140, 59, 8), (4850, 90, 9.5), (5300, 120, 1.5),
                 (5830, 160, -6), (10400, 250, -12.5), (12800, 200, -9.5)]
    # the rim leans mostly to the right: hz, left_minus_right_db
    rim_lean = [(1300, 1.5), (2400, -7), (3150, -14), (4800, -7.5), (8000, 1.5)]
    # clash spectrum: hz, density_db_per_hz
    clash_spectrum = [(100, -4), (250, 1.5), (500, 5.5), (1000, -1.5), (2000, 4), (3000, -7), (3700, -2),
                      (5000, -4.5), (7000, 7.5), (9000, -3.5), (12500, -5), (15500, -13.5)]
    # basket modes, some in beating pairs: hz, level_db, t60_s
    basket = [(1229, -5, .23), (1243, -20, .22), (1717, -25, .25), (2459, -15, .16), (2517, -16, .16),
              (3149, -4, .19), (3168, -12, .21), (3200, -11, .16), (4803, -10, .16), (4950, -2, .17),
              (5017, -14, .14), (5168, -12, .14), (6745, -23, .22), (7752, -5, .13), (8667, -28, .2),
              (12797, -22, .11)]
    thud_db = -29  # the basin under the landing strainer

    rim_env = blows([(s, db, .03) for s, db, clash_db, ring_db in drop], rise=0.0021)
    rim = struck(rim_env, body(rim_modes), width=.2)
    rim = filtered(rim, lambda hz: amp(along(rim_lean, hz) * np.array([[.5], [-.5]])))
    clash_env = blows([(s, db, .05) for s, rim_db, db, ring_db in drop], rise=0.0015)
    clash = clash_env * rush(colour(clash_spectrum))
    tones = ring([(s, db) for s, rim_db, clash_db, db in drop], basket, scatter_db=2.5, width=1.1)
    floor = body([(128, 21, 0), (166, 34, 1), (235, 17, 0.94), (316.5, 22, 1)])
    thud = blows([(7.924, thud_db, 0.22)], rise=0.0034) * rush(floor)
    slide_colour = colour([(1000, -11.5), (2500, 1), (5500, 1.5), (8500, -5.5), (11000, -8), (15500, -14.0)])
    slide = strokes(slides, edge=.012) * rush(slide_colour)
    skid = blows([(7.907, -33.5, .02)], rise=0.0038) * rush(colour(clash_spectrum))
    chatter_colour = colour([(900, -8), (2200, 0), (6000, 1.5), (9000, -16.5), (14000, -36)])
    chatter = blows([(7.95, -48, 0.29)], rise=.004) * amp(2.5 * wobble(110))
    chatter = chatter * rush(chatter_colour, rate=1500, spread_db=3.0)
    return thud + slide + skid + chatter + rim + pan(clash, left_db=-1.5) + pan(tones, left_db=-0.5)


def scrubber():
    """Forced plate vibration and friction: wet slaps ring the steel, each with a thud just behind."""
    # dabs: s, slap_db, basin_thud_db
    dabs = [(8.761, -36, -31), (8.771, -23.5, -25), (8.8446, -37.5, -24), (8.8906, -20.5, -24),
            (9.003, -39.5, -36), (9.076, -26, -33.5)]
    # resonances of the slap, then of the basin under it: hz, width_hz, level_db
    slap_modes = [(470, 40, 2.5), (790, 78, -5.5), (1510, 60, -3), (1720, 80, 4), (1926, 90, 4.5),
                  (2270, 110, -9), (2690, 150, 1.5), (3074, 69, 1.5), (3830, 230, -4.5), (4300, 100, -1),
                  (4470, 98, -4.5), (5230, 130, -3), (5720, 250, -14), (6700, 180, -7)]
    dab_basin = [(140, 44, 5), (208, 54, 4), (242, 41, 3), (339, 37, -5)]
    snap_db, snap_t60_s = -8, 0.043  # the bright crack of a dab, over its slap
    thud_hz, thud_lag_s, thud_t60_s = 217, .006, 0.02  # the panel swings up just behind each slap
    thud_ring_db = -10.5  # the basin rings on after it, over the thud

    slap = struck(blows([(s, db, .028) for s, db, low_db in dabs], rise=0.0039), body(slap_modes), width=0.27)
    snap_env = blows([(s + 0.0013, db + snap_db, snap_t60_s) for s, db, low_db in dabs], rise=0.0017)
    snap_colour = colour([(1100, -2), (1800, -3), (4000, 0), (7500, 7), (11000, -6), (15500, -27)])
    snap = struck(snap_env, snap_colour, width=0.2)
    thud_env = blows([(s + thud_lag_s, db, thud_t60_s) for s, slap_db, db in dabs], rise=0.0044)
    thud_pitch = thud_hz + 14 * wobble(40)
    thud = thud_env * np.sqrt(2) * np.sin(2 * np.pi * np.cumsum(thud_pitch) / SR)
    rumble = blows([(s + thud_lag_s, db + thud_ring_db, .2) for s, slap_db, db in dabs], rise=0.0057)
    rumble = rumble + strokes([(9.0, .16, -42.5)], edge=0.013)
    bristle_colour = colour([(900, -20), (1800, -2), (5000, 1), (15500, -21)])
    bristles = strokes([(8.78, .38, -64)], edge=.012) * amp(1.2 * wobble(25))
    bristles = bristles * rush(bristle_colour, rate=1300, spread_db=1)
    return slap + snap + thud + rumble * rush(body(dab_basin)) + bristles


def motor():
    """Frequency glide: a far motor swells now and then, slowing a little each time."""
    # swells of the drone: start_s, length_s, starting_hz, level_db
    drone = [(6.745, 0.23, 107.8, -38.5), (7.065, 0.021, 92.2, -34), (7.14, 0.34, 87.6, -42),
             (8.1, 0.27, 100.4, -44.5)]
    sag_hz_per_s = 25
    out = np.zeros(N)
    for s, length, hz, db in drone:
        pitch = hz - sag_hz_per_s * (clock() - s)
        tone = np.sqrt(2) * np.sin(2 * np.pi * np.cumsum(pitch) / SR)
        out += strokes([(s, length, db)], edge=0.032) * tone
    return out * amp(2.6 * wobble(22))


def background():
    """Broadband ambient noise: a low room murmur and the drone of a far motor."""
    # room noise spectrum: hz, density_db_per_hz
    air = [(20, -18), (50, 1), (125, -0.5), (220, -11.5), (290, -14.5), (410, -16.5), (520, -26.5),
           (900, -29.5), (1500, -46), (2300, -43.5), (3000, -52), (5500, -52.5), (8000, -59), (15000, -60)]
    return motor() + amp(-49.0 + 1.5 * wobble(6.0)) * rush(colour(air))


def walls(x, wet_db, t60):
    """Dense early reflection: sound between the steel walls gains a short decaying echo."""
    t = np.arange(SR // 8) / SR
    tail = (rng.standard_normal(len(t)) + .5 * rng.standard_normal((2, len(t)))) * amp(-60 * t / t60)
    echo = signal.fftconvolve(x, tail / np.linalg.norm(tail[0]), axes=1)[:, :N]
    high_pass = signal.butter(2, 550, "high", fs=SR, output="sos")
    return x + amp(wet_db) * signal.sosfilt(high_pass, echo)


def kitchen(x):
    """Reverberant decay: the tiled room answers, each frequency dying at its own speed."""
    # reverberation time: hz, t60_s
    decay = [(150, 0.67), (1000, 0.4), (4000, 0.24), (12000, 0.11)]
    hz, t, z = signal.stft(rng.standard_normal((2, SR // 2)), SR, nperseg=256)
    tail = signal.istft(z * amp(-60 * t / along(decay, hz)[:, None]), SR, nperseg=256)[1]
    return signal.fftconvolve(x, tail / np.linalg.norm(tail[0]), axes=1)[:, :N]


def scene():
    """Superposition: water sounds between the basin's walls; the handled things also stir the room."""
    water = walls(pour() + rinse(), wet_db=-9, t60=.06)
    things = walls(spray() + cloth(), wet_db=-12, t60=.035)
    contacts = trigger(t60=0.031) + metal_contacts()
    things = things + pan(contacts, left_db=-1.5) + strainer() + scrubber()
    return water + stopper() + things + amp(-19.5) * kitchen(things) + background()


def record(dry):
    """Spectral balance: the treble is thinner near 7.3 and 13.6 kHz and ends just below 16 kHz."""
    # overall tone: hz, level_db
    tone = [(6200, -0.5), (7300, -15), (8400, -2.5), (12000, 2.5), (13600, -8), (15000, 2)]
    top_hz = 15870
    return filtered(dry, lambda hz: colour(tone)(hz) * np.clip((top_hz - hz) / 300 + .5, 0, 1))


dry = scene()
out = record(dry)
dump(out)
```